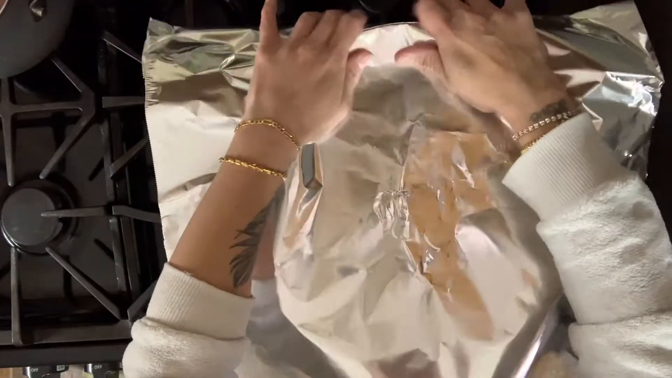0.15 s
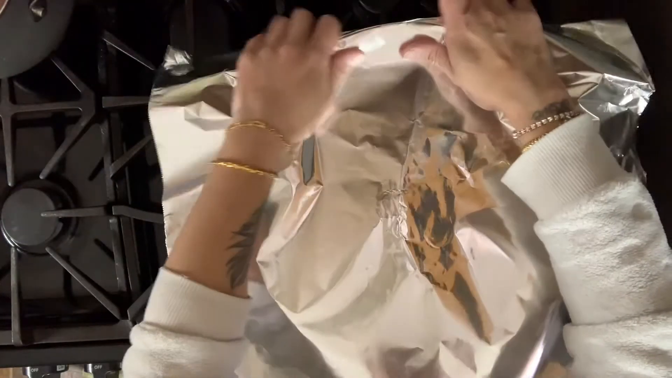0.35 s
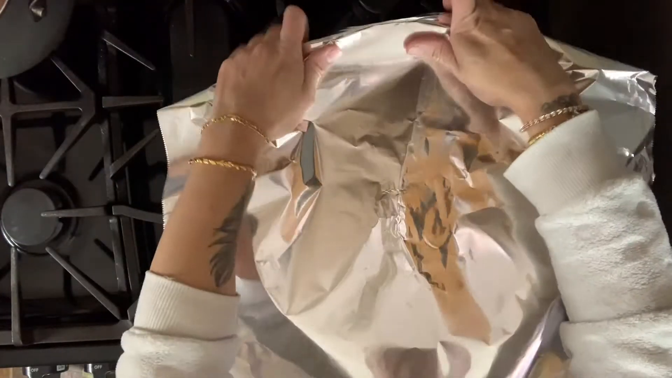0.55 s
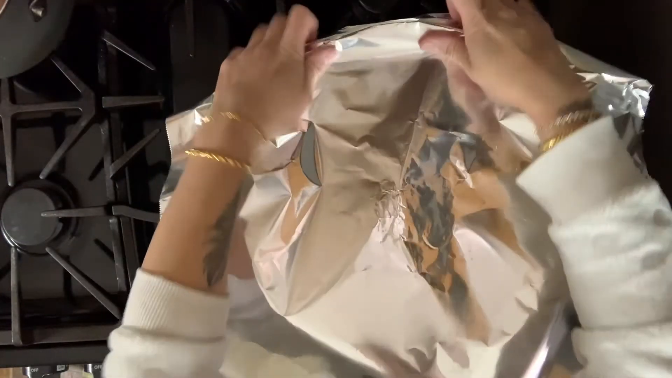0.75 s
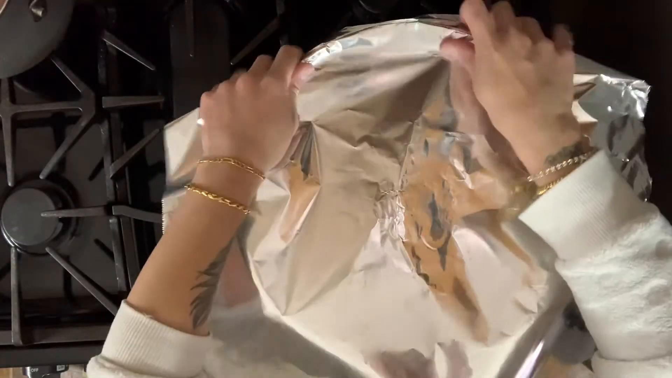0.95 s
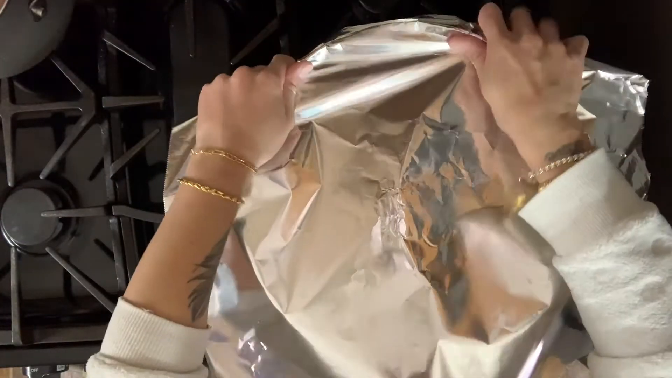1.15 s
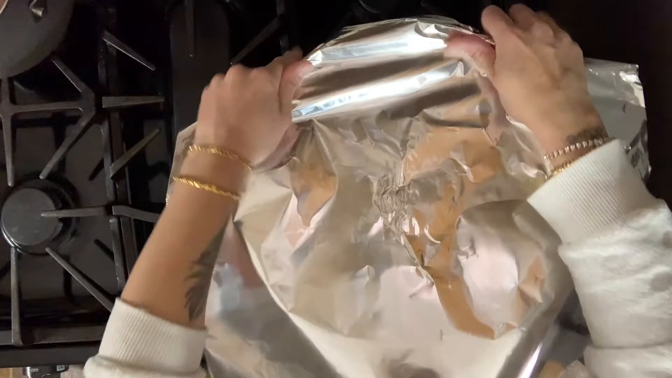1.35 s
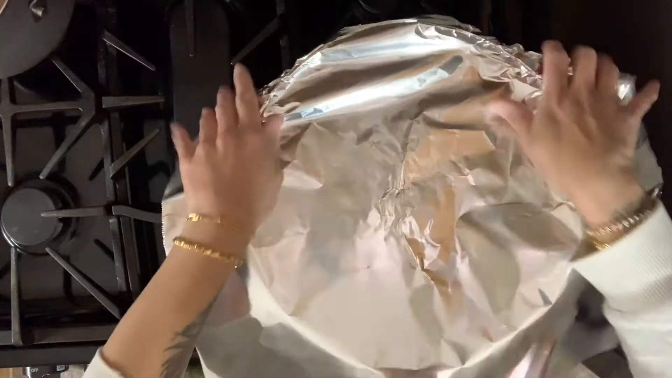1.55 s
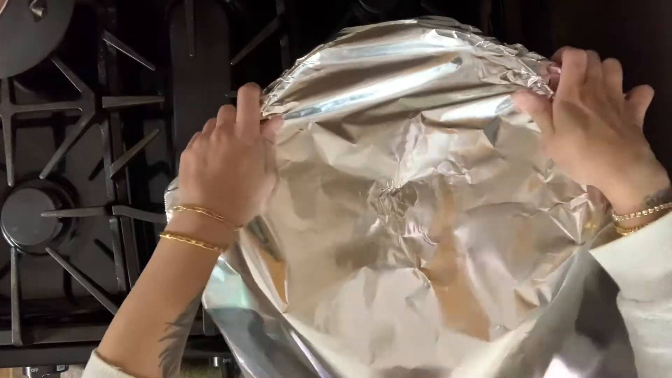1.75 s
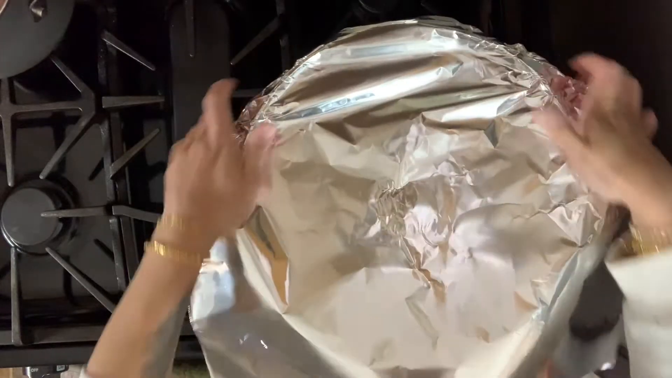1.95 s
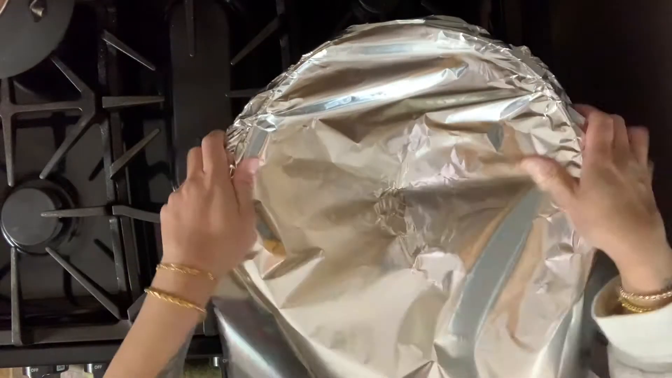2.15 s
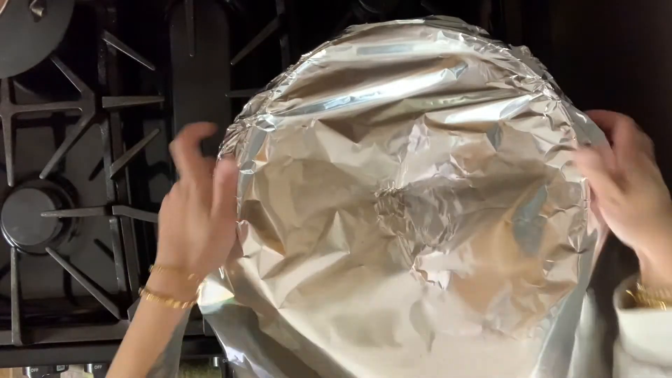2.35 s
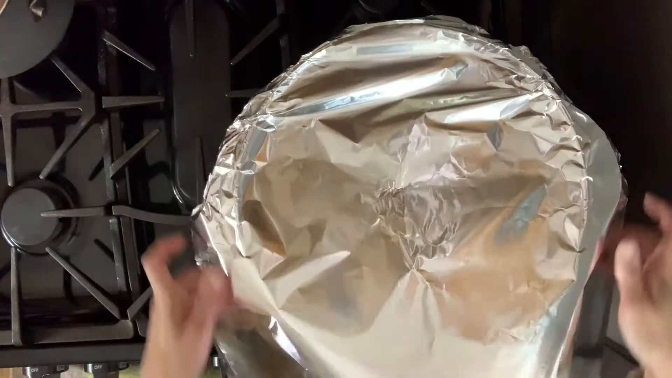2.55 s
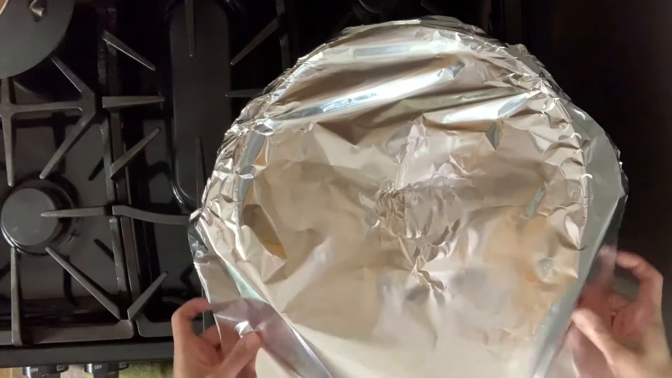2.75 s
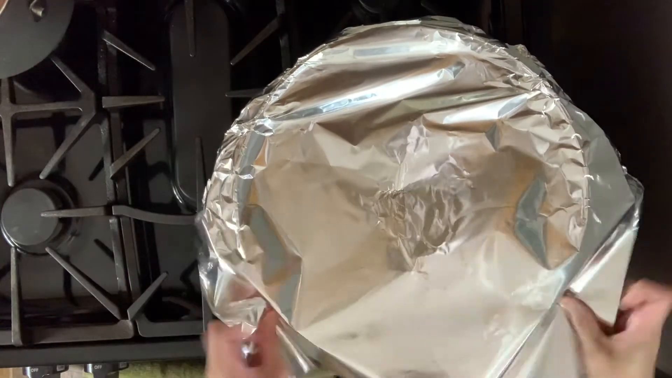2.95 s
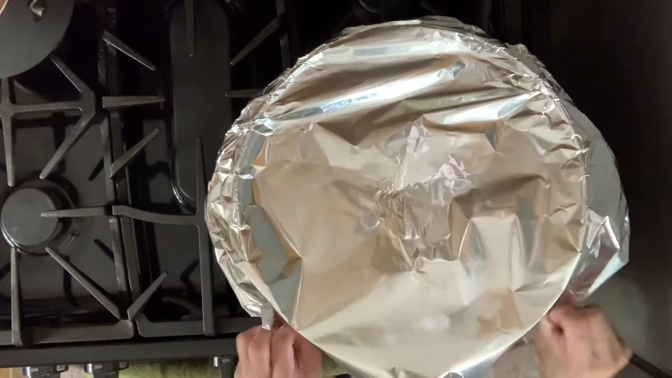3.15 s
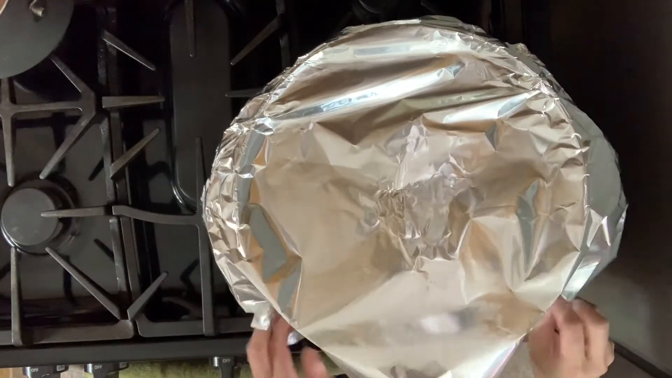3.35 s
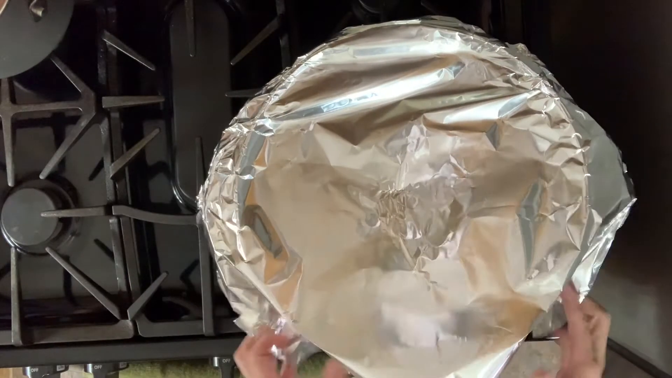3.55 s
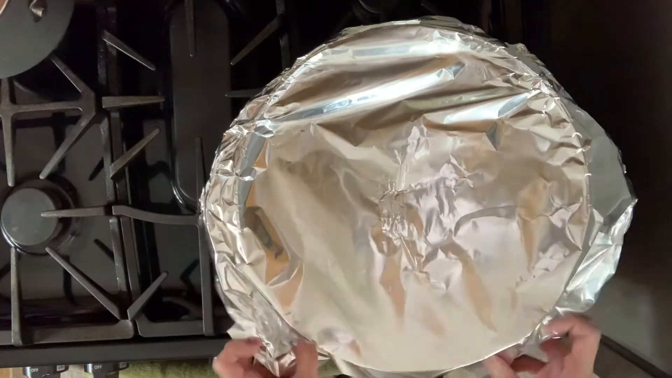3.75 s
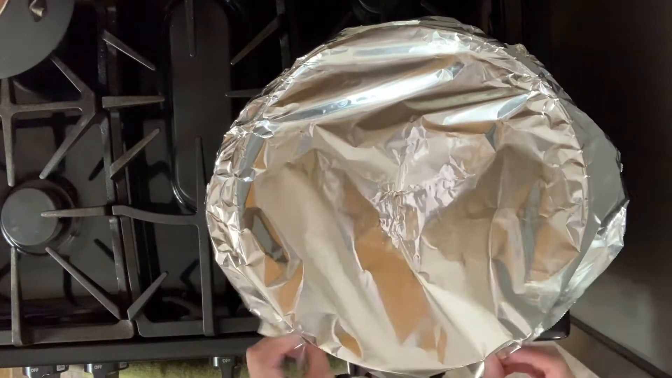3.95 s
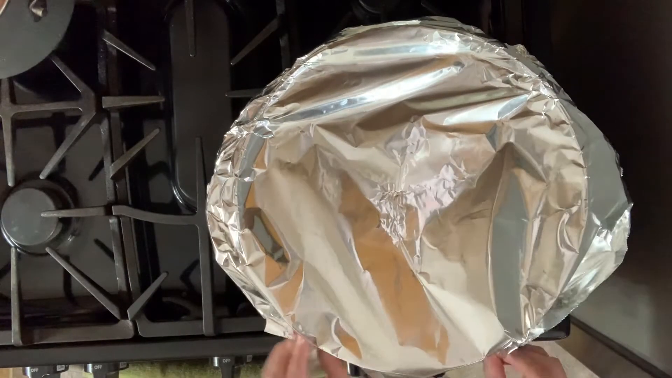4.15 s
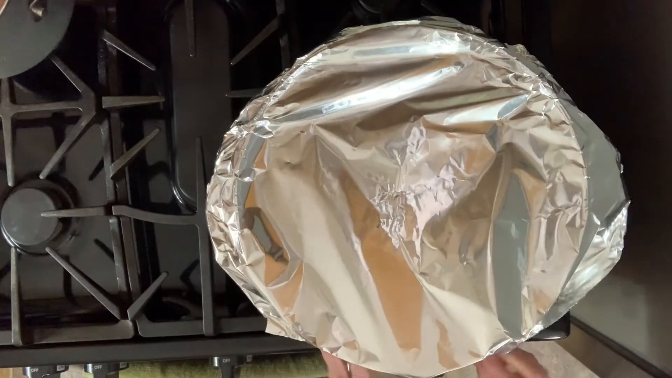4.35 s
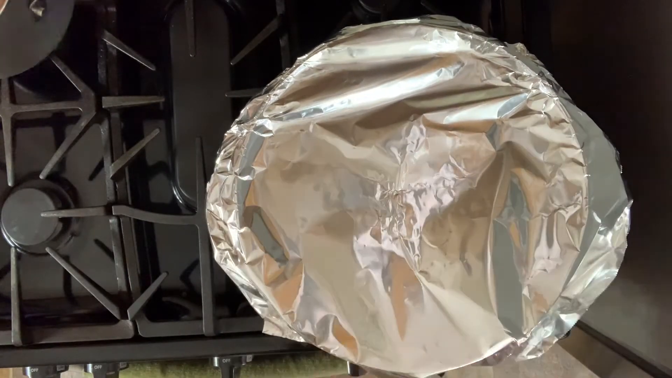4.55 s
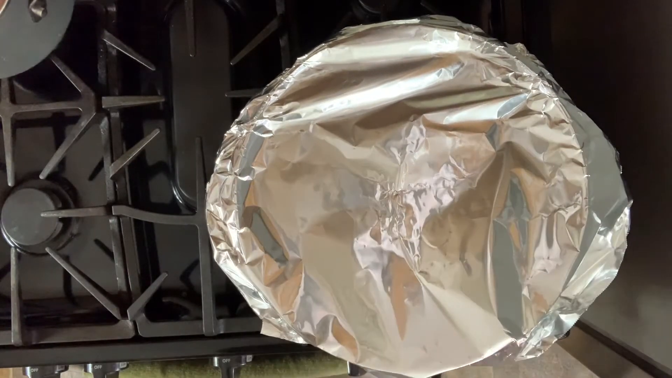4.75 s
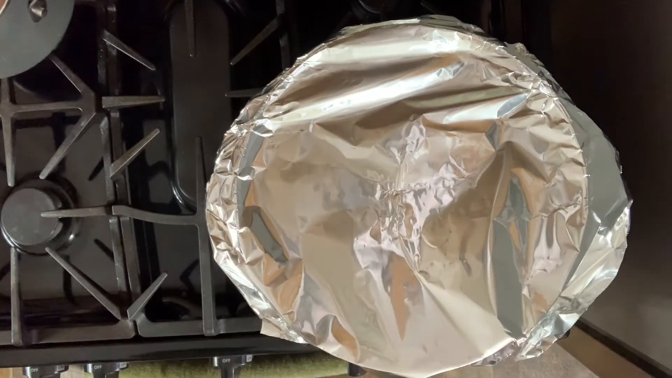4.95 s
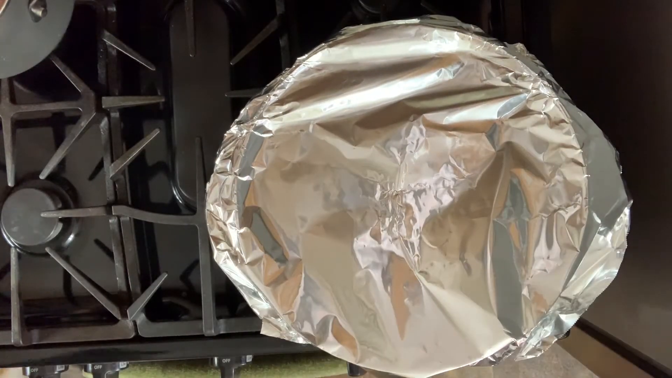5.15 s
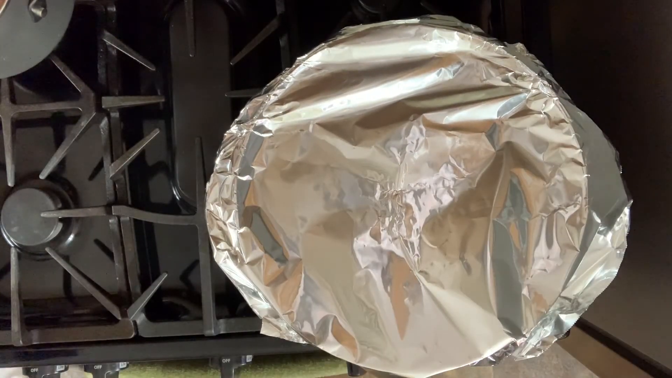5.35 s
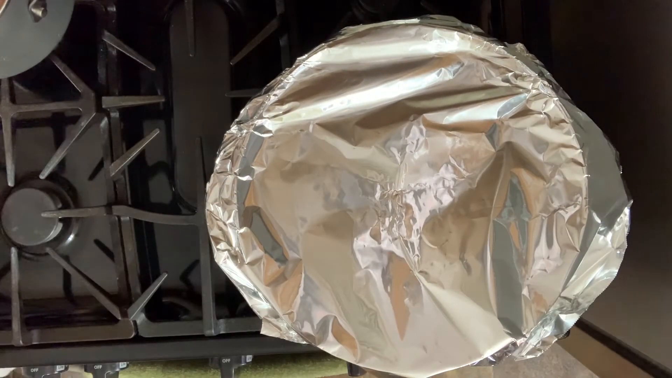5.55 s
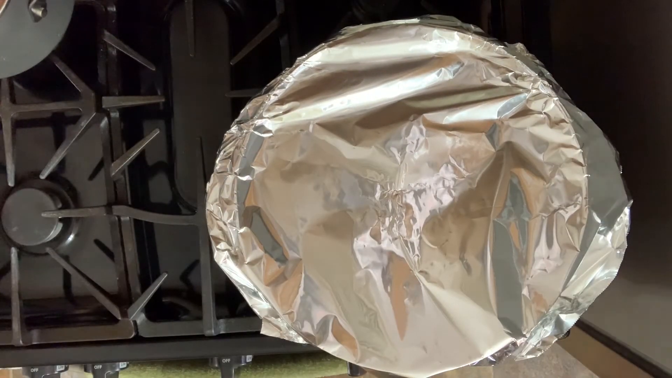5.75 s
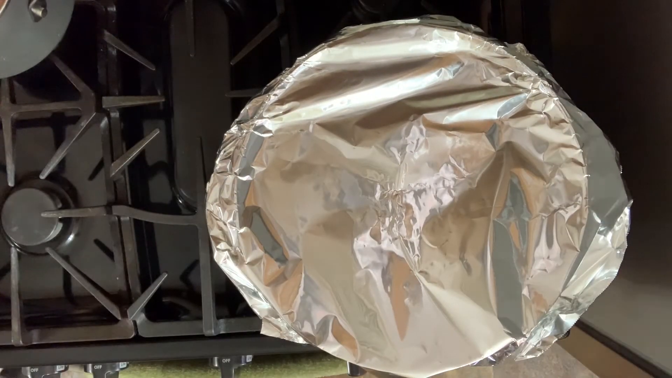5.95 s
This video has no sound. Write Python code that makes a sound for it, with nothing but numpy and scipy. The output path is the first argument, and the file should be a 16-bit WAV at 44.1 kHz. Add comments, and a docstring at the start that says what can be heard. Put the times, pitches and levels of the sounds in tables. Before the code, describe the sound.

Close and crisp, metallic foil crackles continuously as fingers slide and squeeze it, loudest between about one and four seconds. Snappy pops stand out over the rustle, and low damped bumps come from the covered pan. Then the hands let go: a few tiny clicks of settling foil, a soft rub, and quiet kitchen hum. Short room echo, wide stereo.

```python
"""Crimping foil over a pan

Hands press a sheet of aluminium foil over a pan on a stove and crimp it round the rim, then let go.
Squeezes and slides are dense runs of random buckles; creases snap, facets ping, nudges ring damped pan modes.
After the hands let go come dry ticks and a soft swish, over creeping crackle and room hum.
Random echoes place the foil in a kitchen; two microphone ports share part of the sound."""
import sys
import numpy as np
from scipy import signal
from scipy.fft import rfft, irfft, next_fast_len
from scipy.io import wavfile
from scipy.ndimage import uniform_filter1d

SR = 44100
rng = np.random.default_rng(int(sys.argv[2]) if len(sys.argv) > 2 else 0)


def output_pcm(signal):
    """Save a mono or channel-first signal as 16-bit PCM at the path in sys.argv[1].

    Samples are clipped to [-1, 1] before scaling.
    """
    pcm = np.clip(np.atleast_2d(signal).T, -1, 1) * 32767
    wavfile.write(sys.argv[1], SR, np.round(pcm).astype(np.int16))


N = 268569
T = np.arange(N) / SR

# Levels are source levels, ahead of filters, room and ports.
# Low hum of the room: freq_hz, density_db (per Hz)
HUM_SPECTRUM = [(15, -42), (25, -15.5), (48, -1), (112, -0.5), (181, -10.5), (293, -7.5), (515, -15.5),
                (604, -18), (879, -28.5), (1280, -32.5), (1390, -33.5), (2300, -38), (3180, -36.5),
                (5420, -41), (15000, -69)]
# Kitchen decay: freq_hz, t60_s
KITCHEN_DECAY = [(200, 0.22), (1500, 0.27), (4500, 0.35), (9000, 0.13), (15000, 0.2)]
# Two microphone ports: freq_hz, likeness (0-1), left_lead_rad
PORT_LIKENESS = [(100, .97, 0), (380, .6, -.4), (630, .75, -2), (850, .15, -2), (1050, .25, .4),
                 (1230, .5, .1), (1550, .15, 0), (1900, .4, -2.1), (2750, .33, -1.8), (3300, .47, -.7),
                 (3800, .42, .4), (4500, .4, 1), (4700, .2, 1.9), (4950, .45, 2.9), (5600, .42, 3),
                 (6000, .1, 2.4), (6150, .18, 0), (6650, .32, .4), (7100, .45, 1.9), (8100, .83, 2.65),
                 (9300, .998, 3.14), (10300, .85, 3.8), (12200, .8, 5.3), (13200, .99, 6.28),
                 (16000, .97, 6.35)]
# Level difference of the ports: freq_hz, left_minus_right_db
PORT_BALANCE = [(60, 2.5), (180, 2.5), (430, 6), (800, -2), (2000, -0.9), (5000, 0), (16000, 0.5)]
# Soft rubbing: freq_hz, density_db (per Hz)
SWISH_SPECTRUM = [(200, 2), (800, -10), (2000, -7), (4500, -6), (7000, -11), (10000, -29)]
# Faint noise, setting in abruptly and fading: start_s, level_db, t60_s
NOISE_STEPS = [(5.258, -56, 1), (5.657, -67, .3), (5.86, -60, 0.48), (6.06, -70, .4)]
# Spectrum of that noise: freq_hz, density_db (per Hz)
STEP_SPECTRUM = [(300, -4), (1500, 6), (6000, -10), (9000, -4), (15000, -8)]
# Crackle of creeping foil: freq_hz, density_db (per Hz)
CREEP_SPECTRUM = [(300, -15.5), (1200, -3), (3300, 4), (5000, -10.5), (7000, -11.5), (10000, -25.5)]
# Dry clicks of foil settling against the rim: start_s, level_db, centre_hz
RIM_TICKS = [(4.6232, -41, 11000), (4.644, -39, 6300), (4.6569, -44, 6300), (4.674, -50, 3500),
             (4.692, -51, 4400), (4.722, -50, 3400), (4.772, -54, 3500), (5.086, -55, 3100),
             (5.6555, -38.5, 1100), (5.677, -56, 1810), (5.767, -55, 3800), (5.7985, -49.5, 3500),
             (5.987, -54, 1200)]
# Single facets, under the fingers and then settling: start_s, level_db, pitch_hz, ping_re_level_db
FACET_PINGS = [(0.298, -31, 6740, -5), (0.469, -21, 1690, -3.5), (1.417, -29, 7660, -16),
               (1.566, -17.5, 5600, 0), (2.2, -24, 1430, -1), (3.513, -25, 6550, -1),
               (3.791, -21, 1440, 1.5), (3.971, -24, 970, -4), (4.392, -23, 3680, -6.5),
               (4.855, -60, 7550, -3), (4.879, -46.5, 2700, -1), (4.939, -48, 3620, -7),
               (5.024, -55, 2800, -3), (5.091, -45, 3170, 2), (5.122, -49, 2730, -6),
               (5.383, -40, 1400, -4), (5.656, -37, 900, -8), (5.742, -50, 4200, -8),
               (5.7982, -48, 3500, -2), (5.988, -49, 1190, -6), (6.024, -56, 6630, -5)]
# Hands nudging the pan: start_s, level_db (before pan's gain), focus_hz (modes near it answer most)
PAN_NUDGES = [(0.344, -30, 375), (0.702, -28.5, 463), (0.985, -31, 463), (1.241, -28, 460),
              (1.619, -31, 190), (1.755, -32.5, 121), (2.108, -29, 385), (2.421, -46.5, 90),
              (2.538, -35, 300), (2.785, -23, 460), (2.84, -29, 201), (3.129, -34, 90.6), (3.413, -31, 85),
              (3.651, -26, 402), (3.69, -31.5, 190), (3.725, -32, 60), (3.73, -34.5, 320), (3.84, -30, 140),
              (3.876, -34, 90), (4.099, -31, 90), (4.239, -36, 109.6), (4.274, -24.5, 520),
              (4.282, -27, 191), (4.302, -28.5, 130), (4.309, -29.5, 481), (4.324, -34, 99),
              (4.345, -37, 110)]
# Modes of the covered pan: nominal_hz (detuned per nudge), level_db (before focus), t60_s
PAN_MODES = [(55, -4, 0.26), (91.9, -8, .22), (126, -3, 0.13), (172.3, -7, 0.29), (210, -5, 0.16),
             (310.3, -5.5, 0.25), (402, -7.5, 0.11), (460, 4.5, 0.066), (610, -0.5, 0.11), (730, -7, 0.08)]
# Dull contact of a push: freq_hz, density_db (per Hz)
THUD_SPECTRUM = [(50, 1.5), (150, -7), (450, -2.5), (720, 0), (1000, -20), (2000, -27), (6000, -43)]
# Air under the foil: centre_hz, width_hz, lift_db
AIR_RESONANCES = [(458, 60, 8.5), (636, 48, 8.5), (872, 55, 8), (1050, 90, 5.5), (1249, 99, 6),
                  (1430, 55, 4), (1700, 130, 2), (2035, 110, 3)]
# Strongest creases: start_s, level_db, crack_re_level_db
CREASE_SNAPS = [(0.153, -27.5, -2), (0.338, -17.5, -10), (0.3699, -16, -4), (0.418, -12.5, 9.5),
                (0.5794, -20.5, -4), (0.8716, -14.5, -13), (0.9789, -13, -7), (1.0442, -8, -14),
                (1.1331, -9.5, -9), (1.208, -12.5, -9), (1.2489, -11, 0.5), (1.485, -14, -2),
                (1.507, -11.5, 3), (1.537, -11, 13), (1.698, -13.5, 5), (2.0878, -8.5, -7),
                (2.1123, -13, -6), (2.2003, -15.5, -4), (2.274, -15, -4), (2.526, -17, 2.5),
                (2.692, -12.5, 8), (2.7887, -10.5, -1), (2.9509, -14.5, -3.5), (2.995, -19.5, -3),
                (3.0275, -9.5, -10), (3.1006, -13, 3), (3.2073, -20.5, -3), (3.2365, -19.5, -4),
                (3.2516, -20, 4), (3.2897, -20.5, 1), (3.405, -24, -1), (3.4775, -18, -5),
                (3.511, -12, -13), (3.603, -11.5, -3), (3.735, -15.5, 11), (3.79, -15.5, 9.5),
                (3.877, -11, -6), (3.9902, -18, 4.5), (4.2247, -17.5, 0), (4.3297, -27.5, 0),
                (4.3702, -27, -6), (4.391, -17, 5)]
# A tight crease: freq_hz, density_db (per Hz)
CREASE_SPECTRUM = [(60, -31.5), (340, -4.5), (800, -6.5), (2000, -0.5), (3600, 4.5), (5500, 5.5), (8000, 2),
                   (12000, 0.5), (16000, -3.5)]
# The open sheet: freq_hz, density_db (per Hz)
FOIL_SPECTRUM = [(60, -37.5), (200, -12), (340, -8.5), (470, -4.5), (720, -14.5), (950, -10), (1250, -8.5),
                 (2000, -2.5), (2800, -2.7), (3250, 0.5), (4200, -0.4), (5400, 0.5), (7000, 1), (9000, 0.5),
                 (12000, -3), (16000, -10)]
# Hands sliding over the sheet, level before crinkle's gain: time_s, level_db
SLIDE_LEVEL = [(0.0, -34), (0.3, -38), (0.6, -36.5), (0.82, -38), (1.32, -37.5), (1.41, -38.5),
               (1.44, -42.5), (1.475, -46.5), (1.6, -35), (1.93, -36), (2.38, -38), (2.44, -37.5),
               (2.51, -37.5), (2.6, -39.5), (2.92, -37), (3.12, -40), (3.18, -41), (3.29, -38.5),
               (3.46, -43), (3.56, -37.5), (3.9, -39.5), (4.1, -44), (4.16, -44.5), (4.23, -44),
               (4.5, -47.5), (4.64, -57.5), (4.78, -72.5)]
# Finger squeezes, level before crinkle's gain: start_s, length_s (to release), level_db,
# crisp_db (before treble weight), flex_db (before low-mid weight),
# first_band_hz, second_band_hz, tilt_db (added to the first band, taken from the second)
FINGER_SQUEEZES = [(-0.02, 0.1, -29, -4.5, -9, 2410, 4320, 1.5),
                   (0.182, 0.035, -30.5, -0.5, -5.5, 2810, 4040, 3.5),
                   (0.363, 0.15, -36, 1, -1, 1700, 1150, 4.5), (0.639, 0.11, -31, -3, 2.5, 4750, 1530, 1.5),
                   (0.852, 0.062, -31, -7, -3, 2720, 3690, 5),
                   (0.953, 0.11, -33.5, -8, -4.5, 2270, 3560, 6),
                   (1.11, 0.12, -31, -7.5, -4, 2270, 3080, 6.5), (1.199, 0.087, -30, 1, -3, 1835, 2900, 2),
                   (1.347, 0.06, -32.5, -9, -11, 2560, 4400, 2.5),
                   (1.502, 0.115, -26, 0, -4.5, 5800, 2600, -1),
                   (1.615, 0.155, -28.5, 0, -2.5, 3200, 4040, 1.5),
                   (1.819, 0.053, -30, -2.5, -4, 2010, 1480, 1.5),
                   (1.955, 0.11, -30, -2.5, -6, 4500, 3370, 3),
                   (2.075, 0.023, -20.5, 1.5, -6.5, 4430, 3300, 2.5),
                   (2.133, 0.085, -30, -0.5, 1.5, 1400, 2340, 6),
                   (2.251, 0.12, -29.5, 0.5, -14.5, 4700, 1400, -2),
                   (2.518, 0.11, -28.5, -0.5, -5.5, 1890, 1310, 3),
                   (2.663, 0.08, -26.5, -1.5, -12, 5650, 3300, 2),
                   (2.769, 0.046, -25, 2.5, -8.5, 5000, 3600, 0.5),
                   (2.988, 0.072, -29, -3.5, -0.5, 1835, 1410, -0.5),
                   (3.085, 0.034, -32.5, 2.5, -6, 5000, 2980, 4),
                   (3.23, 0.026, -41.5, 8.5, 1.5, 1730, 3080, 10),
                   (3.338, 0.016, -40.5, -8, 15.5, 1200, 2500, 11),
                   (3.371, 0.024, -35, -1, 1, 4040, 2980, 6), (3.488, 0.075, -34.5, 3, -14, 3690, 2070, 4),
                   (3.588, 0.035, -27, 4, -13, 6570, 2980, 0), (3.633, 0.045, -26, 4, 2.5, 1200, 1635, 3),
                   (3.702, 0.043, -34, 4, 1.5, 1890, 4700, 5), (3.809, 0.034, -32.5, 0, -1, 3580, 4850, 4),
                   (3.861, 0.076, -33, -1, -4.5, 2810, 4565, 3),
                   (3.973, 0.023, -30.5, 2.5, 4, 3470, 1890, 4.5),
                   (4.179, 0.077, -36.5, -4, 3.5, 1440, 2040, 7),
                   (4.261, 0.076, -40, -4, -1.5, 1310, 1835, 3.5),
                   (4.354, 0.014, -40, 6, -9.5, 3470, 2490, 5),
                   (4.465, 0.044, -30.5, 0.5, -3, 1350, 1850, 2)]
# Reach of crispness and of sheet flexing: freq_hz, weight
TREBLE_WEIGHT = [(5000, 0.0071), (12000, 0.85)]
LOW_MID_WEIGHT = [(1500, 0.67), (3600, 0.058)]

HUM_DB = -43
LOW_CUT_HZ, EDGE_HZ = 47, 15850
SWISH_S, SWISH_DB, SWISH_RISE_DB_PER_S, SWISH_FALL_DB_PER_S = 5.268, -48.5, 552, 57
SNAP_FADE_S = 0.02  # to 1/e
ATTACK_S, RELEASE_S = 0.016, 0.028  # release to 1/e amplitude
SLIDE_CRISP_DB, SLIDE_FLEX_DB = -6, 2  # before weights; duller than most squeezes
# Duller still as the touch gets lighter than usual; slopes are dB of tone per dB of level
SLIDE_USUAL_DB, CRISP_PER_DB, FLEX_PER_DB = -36, 0.3, -0.73
BAND_OCTAVES = 0.17  # half-width to 1/e of a squeeze's two tone bands


def amp(db):
    """Decibels to gain."""
    return 10 ** (np.asarray(db) / 20)


def unit(x):
    """Scale to rms 1."""
    return x / np.sqrt(np.mean(x ** 2) + 1e-20)


def read(table, hz, axis=1):
    """Interpolate one table column on a log-frequency axis."""
    columns = np.transpose(table)
    return np.interp(np.log(hz + 1), np.log(columns[0] + 1), columns[axis])


def add(mix, start_s, sound):
    """Add a sound to both channels at a time."""
    part = mix[:, max(round(start_s * SR), 0):][:, :sound.shape[-1]]
    part += sound[..., :part.shape[1]]


def colour(x, spectrum):
    """Filter by a spectrum, keeping the power of white input."""
    size = next_fast_len(x.shape[-1] + 4096)
    gain = unit(amp(read(spectrum, np.fft.rfftfreq(size, 1 / SR))))
    return irfft(rfft(x, size) * gain, size)[..., :x.shape[-1]]


def burst(spectrum, decay_s):
    """0.1 s of coloured noise decaying exponentially from about rms 1."""
    fade = np.exp(-T[:SR // 10] / decay_s)
    noise = colour(rng.standard_normal((2, len(fade))), spectrum) * fade
    return noise * np.linalg.norm(fade) / np.linalg.norm(noise, axis=1, keepdims=True)


def hum():
    """Low, steady room noise: white noise shaped by the hum spectrum."""
    return amp(HUM_DB) * colour(rng.standard_normal((2, N)), HUM_SPECTRUM)


def reflections(echoes_per_s=3000, gap_s=0.003):
    """Sparse random-sign echoes from stove and walls, each band dying at its own speed."""
    t = T[:SR * 3 // 4]
    signs = rng.choice([-1., 1.], (2, len(t)))
    present = rng.random((2, len(t))) < echoes_per_s / SR
    taps = signs * present * (t > gap_s)
    hz, frame_s, bands = signal.stft(taps, SR, nperseg=256)
    decay_db = -60 * frame_s / read(KITCHEN_DECAY, hz)[:, None]
    tail = signal.istft(bands * amp(decay_db), SR, nperseg=256)[1]
    return tail / np.linalg.norm(tail, axis=1, keepdims=True)


def kitchen(x, wet_db=-2.5, count=10):
    """Sound leaves from changing places round the rim, each with its own echoes."""
    place = rng.integers(0, count, N // 512 + 1).repeat(512)[:N]
    wet = np.zeros((2, N))
    for k in range(count):
        wet += signal.fftconvolve(x * (place == k), reflections(), axes=1)[:, :N]
    return x + amp(wet_db) * wet


def ports(x):
    """Two close microphone ports share part of the sound, with a phase and level difference."""
    size = next_fast_len(N + 4096)
    hz = np.fft.rfftfreq(size, 1 / SR)
    left, other = rfft(x, size)
    same = np.clip(read(PORT_LIKENESS, hz, axis=1), 0, 1)
    lag = np.exp(-1j * read(PORT_LIKENESS, hz, axis=2))
    right = (same * left + np.sqrt(1 - same ** 2) * other) * lag
    lean = amp(read(PORT_BALANCE, hz) / 2)
    return irfft(np.array([left * lean, right / lean]), size)[:, :N]


def noise_steps():
    """Faint coloured noise that sets in abruptly and fades linearly in dB."""
    level = np.zeros((2, N))
    for start_s, level_db, t60_s in NOISE_STEPS:
        add(level, start_s, amp(level_db - 60 * T[:SR] / t60_s))
    return level * colour(rng.standard_normal((2, N)), STEP_SPECTRUM)


def swish():
    """Soft swish as the arms draw back: coloured noise rising, then falling, linearly in dB."""
    rise_db = SWISH_RISE_DB_PER_S * (SWISH_S - T)
    fall_db = SWISH_FALL_DB_PER_S * (T - SWISH_S)
    level_db = SWISH_DB - np.maximum(rise_db, fall_db)
    return amp(level_db) * colour(rng.standard_normal((2, N)), SWISH_SPECTRUM)


def facet(ring_s, ring_db, crack_s, count=3):
    """One foil patch flipping: a noise crack and short random modes, phases and noise drawn per channel."""
    t = np.arange(768) / SR
    hz = rng.uniform(np.sqrt(550), np.sqrt(16000), (count, 1)) ** 2  # denser at low pitch
    phase_turns = rng.random((2, count, 1))
    modes = np.sin(2 * np.pi * (hz * t + phase_turns)).sum(1) * np.exp(-t / ring_s)
    crack = rng.standard_normal((2, len(t))) * np.exp(-t / crack_s)
    return unit(unit(crack) + amp(ring_db) * unit(modes)) / np.sqrt(len(t))


def buckles(per_s, spread_db, count=22):
    """Random buckles of scattered sizes on fresh facets; expected power 1 whatever the rate."""
    chance = np.clip(per_s / SR, 1e-4, 1)
    size = unit(amp(spread_db * np.minimum(rng.exponential(1, len(chance)), 4.5)))
    clicks = size * (rng.random(len(chance)) < chance) / np.sqrt(chance)
    which = rng.integers(0, count, len(chance)) == np.arange(count)[:, None]
    shapes = np.array([facet(ring_s=0.0045, ring_db=-3, crack_s=0.0008) for _ in range(count)])
    return signal.fftconvolve((clicks * which)[:, None], shapes, axes=2).sum(0)


def crumple(per_s, spread_db, size=4096):
    """Folding keeps making new facets: buckle pitches are redrawn every block."""
    out = np.zeros((2, N))
    for at in range(0, N, size):
        add(out, at / SR, buckles(per_s[at:at + size], spread_db))
    return out


def relaxing(level_db=-73, per_s=70, spread_db=1.5):
    """Bent foil creeps in faint, scattered buckles at a constant mean rate throughout."""
    return amp(level_db) * colour(crumple(np.full(N, per_s), spread_db), CREEP_SPECTRUM)


def ticks(decay_s=0.0014, below_db=-14, above_db=-11, top_db=-26):
    """Foil settles against the rim: short noise clicks, each a wide band round its own pitch."""
    out = np.zeros((2, N))
    for start_s, level_db, hz in RIM_TICKS:
        above_hz = min(hz * 1.7, SR / 2 - 1)
        band = [(hz / 2, below_db), (hz, 0), (above_hz, above_db), (SR / 2, top_db)]
        add(out, start_s, amp(level_db) * burst(band, decay_s))
    return out


def pings(ring_s=0.0045, click_db=-11, click_s=0.002, skirt_db=-12):
    """Single facets flip with a short decaying sine and a noise click coloured round its pitch."""
    out, t = np.zeros((2, N)), T[:SR // 10]
    for start_s, level_db, hz, ping_db in FACET_PINGS:
        ping = np.exp(-t / ring_s) * np.sin(2 * np.pi * (hz * t + rng.random((2, 1))))
        band = [(hz / 2, skirt_db), (hz, 0), (hz * 2, skirt_db), (SR / 2, 2 * skirt_db)]
        click = burst(band, click_s)
        add(out, start_s, amp(level_db + ping_db) * ping + amp(level_db + click_db) * click)
    return out


def pan(gain_db=1.0, focus_db_per_octave=8, detune=0.04, attack_s=0.0012, thud_db=-10, thud_s=0.012):
    """A push thuds and starts the damped pan modes together; where it lands sets which answer."""
    out, t = np.zeros((2, N)), T[:SR // 3]
    hz, mode_db, t60_s = np.transpose(PAN_MODES)[:, :, None]
    rise = 1 - np.exp(-t / attack_s)
    for start_s, level_db, focus_hz in PAN_NUDGES:
        turns = hz * (1 + detune * rng.standard_normal(hz.shape)) * t
        share = amp(mode_db - focus_db_per_octave * abs(np.log2(hz / focus_hz)))
        share = share / np.linalg.norm(share)
        ring = (share * amp(-60 * t / t60_s) * np.exp(2j * np.pi * turns)).sum(0)
        knock = np.array([ring.imag, ring.real])  # channels a quarter turn apart
        add(knock, 0, amp(thud_db) * burst(THUD_SPECTRUM, thud_s))
        add(out, start_s, amp(level_db + gain_db) * knock * rise)
    return out


def hollow(x):
    """Air under the foil: broad resonances of the covered pan lift their bands."""
    size = next_fast_len(N + 4096)
    hz = np.fft.rfftfreq(size, 1 / SR)
    lift_db = sum(db / (1 + (2 * (hz - centre_hz) / width_hz) ** 2)
                  for centre_hz, width_hz, db in AIR_RESONANCES)
    return irfft(rfft(x, size) * amp(lift_db), size)[:, :N]


def snaps(run_db=-13, per_s=5000):
    """A crease lets go with one crack and a dying run of buckles, in the crease's bright colour."""
    out, t = np.zeros((2, N)), T[:SR // 8]
    for start_s, level_db, crack_db in CREASE_SNAPS:
        crack = facet(ring_s=0.0033, ring_db=5.5, crack_s=0.00047)
        add(out, start_s, amp(level_db + crack_db) * crack)
        run = buckles(np.full(len(t), per_s), spread_db=-0.3, count=14)[:, :len(t)]
        add(out, start_s, amp(level_db + run_db) * np.exp(-t / SNAP_FADE_S) * run)
    return colour(out, CREASE_SPECTRUM)


def squeeze(t, start_s, length_s):
    """Power of one squeeze: linear amplitude attack, hold, exponential release."""
    rise = np.clip((t - start_s) / ATTACK_S, 0, 1)
    release = np.exp(-np.clip(t - start_s - length_s, 0, 1) / RELEASE_S)
    return (rise * release) ** 2


def tone_band(hz, centre_hz):
    """Bell-shaped band on an octave axis."""
    return np.exp(-(np.log2((hz[:, None] + 1) / centre_hz) / BAND_OCTAVES) ** 2)


def hands(t, hz):
    """Effort over time and its tone in dB per pitch, averaged over touches by their power."""
    top = read(TREBLE_WEIGHT, hz)[:, None]
    low = read(LOW_MID_WEIGHT, hz)[:, None]
    slide_db = np.interp(t, *np.transpose(SLIDE_LEVEL), right=-120)
    re_usual_db = np.maximum(slide_db, SLIDE_LEVEL[-1][1]) - SLIDE_USUAL_DB
    slide_crisp_db = SLIDE_CRISP_DB + CRISP_PER_DB * re_usual_db
    slide_flex_db = SLIDE_FLEX_DB + FLEX_PER_DB * re_usual_db
    power = amp(slide_db) ** 2
    tone = power * (top * slide_crisp_db + low * slide_flex_db)
    for (start_s, length_s, level_db, crisp_db, flex_db,
         first_band_hz, second_band_hz, tilt_db) in FINGER_SQUEEZES:
        press = amp(level_db) ** 2 * squeeze(t, start_s, length_s)
        # each squeeze's tone, tilted between two bands
        tilt = tilt_db * (tone_band(hz, first_band_hz) - tone_band(hz, second_band_hz))
        power = power + press
        tone = tone + press * (top * crisp_db + low * flex_db + tilt)
    return np.sqrt(power), tone / power


def crinkle(gain_db=3.0, per_s=1300, idle_per_s=550, drift_db=1.2):
    """Harder squeezes buckle more facets, louder; each touch shapes the spectrum its own way."""
    hz, frame_s, _ = signal.stft(T, SR, nperseg=256)
    effort, tone_db = hands(frame_s, hz)
    effort = np.interp(T, frame_s, effort)
    grain = crumple(idle_per_s + per_s * effort / effort.mean(), spread_db=0.5)
    bands = signal.stft(colour(grain, FOIL_SPECTRUM) * effort, SR, nperseg=256)[2]
    # resonances come and go as the sheet changes shape
    drift = uniform_filter1d(rng.standard_normal(bands.shape[1:]), size=3, axis=0)
    drift = unit(uniform_filter1d(drift, size=16, axis=1))
    shaped = bands * amp(tone_db + drift_db * drift)
    return amp(gain_db) * signal.istft(shaped, SR, nperseg=256)[1][:, :N]


def scene():
    """Foil and pan in the kitchen, over its hum; echoes on buckles, snaps and ticks only."""
    foil = hollow(crinkle() + snaps() + relaxing()) + ticks()
    return ports(kitchen(foil) + pings() + pan() + hum()) + swish() + noise_steps()


def record(dry):
    """Microphone low cut, then a steep linear-phase band limit."""
    low_cut = signal.butter(4, LOW_CUT_HZ, "highpass", fs=SR, output="sos")
    dry = signal.sosfilt(low_cut, dry)
    band_limit = signal.firwin(511, EDGE_HZ, window=("kaiser", 9), fs=SR)
    return signal.oaconvolve(dry, band_limit[None], "same")


dry = scene()
out = record(dry)
output_pcm(out)
```